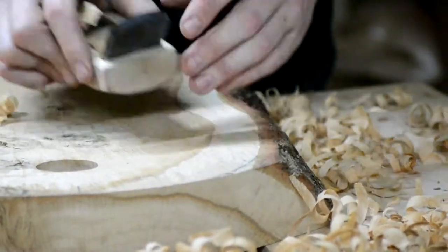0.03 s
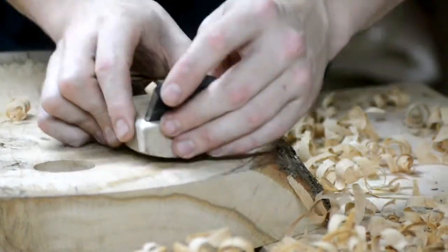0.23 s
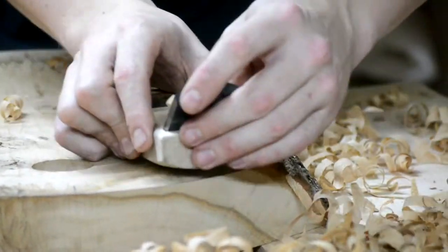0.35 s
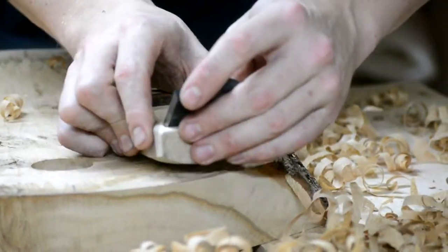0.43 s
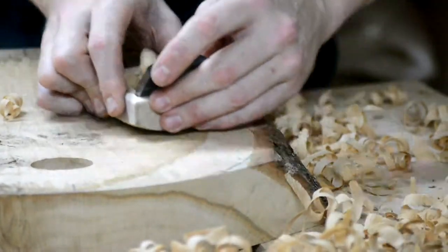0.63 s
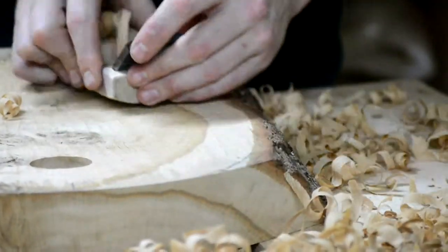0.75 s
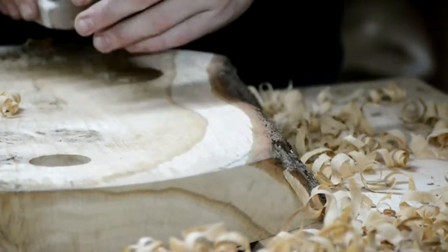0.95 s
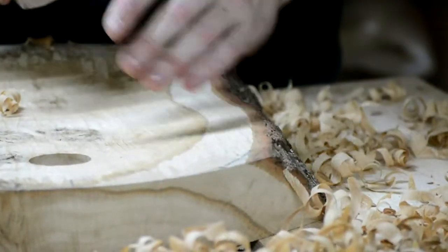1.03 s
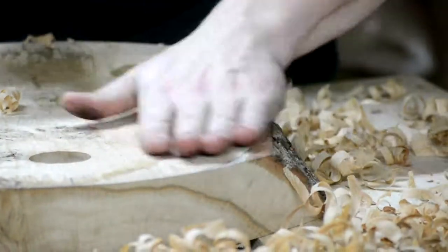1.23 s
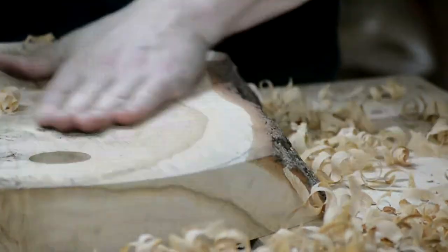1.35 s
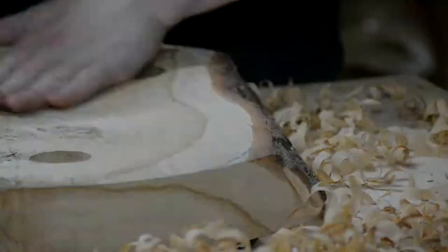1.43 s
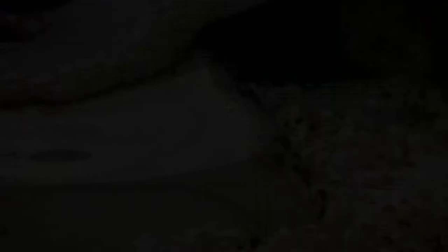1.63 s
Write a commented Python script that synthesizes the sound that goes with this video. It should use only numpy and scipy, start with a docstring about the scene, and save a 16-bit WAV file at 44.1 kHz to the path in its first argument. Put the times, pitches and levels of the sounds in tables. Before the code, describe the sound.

One crisp hand-plane stroke scrapes over hollow wood, followed by a soft pat and brushing palm

```python
"""Quiet workshop air with a thin electronic whine; a small hand plane is set down on a carved wooden seat,
rocks once and takes one shaving; then a palm pats the seat and sweeps across the wood twice.
Air, fibres and skin are shaped noise; knocks, judder and drag excite decaying seat modes, and irregular
slips ring the blade. A low bench thud sounds under the plane's two main knocks and the palm's pat, and a
decaying noise tail gives the short echo."""
import sys
import numpy as np
from scipy import signal
from scipy.fft import rfft, irfft, next_fast_len
from scipy.io import wavfile
from scipy.ndimage import uniform_filter1d

SR = 44100
rng = np.random.default_rng(int(sys.argv[2]) if len(sys.argv) > 2 else 0)


def master_out(mix):
    """Clip the mix to full scale and print it as 16-bit PCM to the path in sys.argv[1]."""
    frames = np.transpose(np.atleast_2d(mix))
    ceiling = np.clip(frames, -1, 1)
    pcm = np.round(ceiling * 32767).astype(np.int16)
    wavfile.write(sys.argv[1], SR, pcm)


def invert_db(level):
    """Linear amplitude ratio for a level in decibels (20 dB per decade), elementwise."""
    return 10 ** (np.asarray(level, dtype=float) / 20)


N = 74970
TIME = np.arange(N) / SR  # s

# Spectrum of tearing wood fibres, also heard in each contact tick.
# Each row: frequency in Hz, relative spectral level in dB.
FIBRE_SPECTRUM = [(410, -7), (700, -4), (980, -27.5), (1120, -9), (2220, -12), (2800, -18.5), (3540, -6),
                  (4350, -18.5), (10500, -34), (15500, -61)]
PRESSED_FREE_S = 0.018  # how long the seat rings freely under a sliding tool or palm


def level(x, db):
    """Scales a signal to a given root-mean-square level."""
    return x * invert_db(db) / np.sqrt(np.mean(x ** 2))


def unit(h):
    """Normalises an impulse response to unit energy."""
    return h / np.sqrt(np.sum(h ** 2))


def conv(x, h):
    """Linear response by convolution, cut to the scene's length."""
    return signal.fftconvolve(x, h)[:N]


def colour(x, table):
    """Spectral shaping by (Hz, dB) points on a log axis; white noise of rms 1 stays near rms 1."""
    n = next_fast_len(len(x) + 4096)
    points = np.array(table, float)
    hz = np.arange(n // 2 + 1) * SR / n
    gain = invert_db(np.interp(np.log(hz + 1), np.log(points[:, 0]), points[:, 1]))
    gain = gain / np.sqrt(np.mean(gain ** 2))
    return irfft(rfft(x, n) * gain, n)[:len(x)]


def curve(table, axis):
    """Envelope interpolated in dB from one column: -120 dB before the first row, held after the last."""
    points = np.array(table, float)
    db = np.interp(TIME, points[:, 0], points[:, axis], left=-120, right=points[-1, axis])
    return invert_db(db)


def walk(rate):
    """Slow random modulation: levels held for 1 / rate seconds, smoothed by two moving averages."""
    hold = int(SR / rate)
    steps = np.repeat(rng.standard_normal(N // hold + 1), hold)
    return 0.6 * uniform_filter1d(uniform_filter1d(steps, hold), hold)[:N]


def grit(rate, spread_db, smooth):
    """Friction as random slips of uneven size (rate per second) over a share of even noise, rms 1."""
    happens = rng.random(N) < rate / SR
    sign = rng.choice([-1, 1], N)
    slips = happens * sign * invert_db(spread_db * rng.exponential(size=N))
    return level(level(slips, 0) + smooth * rng.standard_normal(N), 0)


def stroke_position():
    """Linear travel of the plane along its stroke, from 0 to 1."""
    return np.interp(TIME, (0.48, 0.9), [0, 1])


def seat_ring(place, free_s):
    """Modal superposition: the place touched weights each mode; pressure adds damping after free_s."""
    # Seat modes. Each row: frequency in Hz, relative level in dB, 60 dB decay time in seconds.
    seat_modes = [(151.4, -10, 0.19), (186.1, -8.5, .45), (217.6, -1.5, 0.11), (294.4, -14, 0.36),
                  (328.5, 1, 0.32), (354.6, -7.5, 0.24), (387.7, -4, 0.45), (463, -2, 0.061),
                  (538, -6.5, 0.11), (641.2, -1.5, 0.22), (668, -8, 0.12), (788, -18.5, 0.62),
                  (927, -14, 0.046), (1040, -7.5, 0.064), (1104, -6.5, 0.087), (1230, -8.5, 0.054),
                  (1470, -14.5, 0.13), (1719, -16, .08), (1930, -12, 0.15), (2197, -14, 0.028)]
    t = np.arange(SR // 2) / SR
    ring = np.zeros(len(t))
    for hz, db, t60 in seat_modes:
        # bending wavelength falls as the square root of frequency
        shape = np.sin(np.pi * place * np.sqrt(hz / 30))
        decay = np.exp(-np.log(1000) * t / t60)
        ring += invert_db(db) * shape * np.sin(2 * np.pi * hz * t) * decay
    pressed = np.exp(-np.maximum(t - free_s, 0) / 0.012)
    return ring * pressed


def shop():
    """Stationary shaped noise, as mid and side, for workshop air; a steady sine for an electronic whine."""
    # Air in the mid and side channels. Each row: frequency in Hz, relative spectral level in dB.
    mid_spectrum = [(15, -57.5), (25, -22), (148, -25), (274, -11.5), (359, -7.5), (421, -14.5), (666, -12),
                    (848, -18), (1050, -13.5), (1140, -15), (2920, -26), (10600, -41), (15500, -52)]
    side_spectrum = [(15, -59), (25, -29), (349, -8), (389, -7), (848, -5.5), (919, -8), (1170, -5),
                     (15500, -27.5)]
    whine = invert_db(-75) * 2 ** .5 * np.sin(2 * np.pi * 15671 * TIME)
    air = level(colour(rng.standard_normal(N), mid_spectrum), -51.5)
    air = air * invert_db(0.233 * walk(2))  # gentle unsteadiness in dB
    side = level(colour(rng.standard_normal(N), side_spectrum), -60)
    return air + whine, side


def blade(cut):
    """Stick-slip excitation of resonances: slips at the edge ring the plane's blade and body."""
    # Blade and body resonances. Each row: frequency in Hz, bandwidth in Hz, relative level in dB,
    # change in level along the stroke in dB.
    resonances = [(1132, 44, -1, 5), (1367, 280, -9.5, 32), (1573, 49, -5, -4), (1642, 23, 0.5, -14),
                  (1862, 61, -1, 8), (2202, 52, 0, -4), (2627, 78, -9, 1), (2897, 88, -7.5, -6.5),
                  (3370, 130, -6, 4), (3630, 250, -10, 4), (4750, 350, -16.5, 5), (5230, 73, -12, -3),
                  (6220, 300, -13, 6), (9200, 500, -21.5, 3), (10600, 900, -23, -0.5)]
    t = np.arange(SR // 10) / SR
    along = stroke_position()
    edge = grit(2000, 2.5, 0.9) * cut * invert_db(4.3 * walk(38.6))
    out = np.zeros(N)
    for k, (hz, width_hz, db, gain_db) in enumerate(resonances):
        ring = unit(np.sin(2 * np.pi * hz * t) * np.exp(-np.pi * width_hz * t))
        gain = invert_db(db + gain_db * (along - .5) + 1.9 * walk(17.65))
        polarity = (-1) ** k
        out += polarity * gain * conv(edge, ring) * np.sqrt(width_hz / 400)
    return invert_db(0.5) * out


def fibres(cut):
    """Fracture noise: many small irregular slips, spectrally shaped, for tearing fibres."""
    return colour(grit(5600, 1.9, 0.78) * cut, FIBRE_SPECTRUM)


def plane_edge():
    """Common excitation: one envelope of dragging and cutting drives both blade and fibres."""
    # Dragging and cutting. Each row: time in seconds, relative level in dB.
    cutting = [(.222, -82), (.228, -49), (.25, -53), (.3, -49.5), (.35, -74), (.372, -51), (.41, -70.5),
               (.45, -83), (.475, -52.5), (.495, -43), (.52, -36), (.555, -32.5), (.59, -31), (.65, -31.5),
               (.7, -31.5), (.76, -32), (.812, -34.5), (.826, -42.5), (.86, -45), (.9, -55), (.95, -65),
               (1.02, -62)]
    cut = curve(cutting, axis=1) * (TIME < cutting[-1][0])
    return blade(cut) + fibres(cut)


def knocks():
    """Impact excitation: a short rounded push rings the seat modes, with a noisy tick of contact."""
    # Knocks on the seat. Each row: start in seconds, relative level in dB, contact in ms,
    # place from the edge (0-1), time in seconds until hand or tool presses down and damps the ring.
    landings = [(0.227, -16.5, 0.33, 0.3, 0.022), (0.2318, -12, 0.41, .40, 0.034),
                (0.2531, -17.5, .6, 0.37, 0.014), (0.297, -18, 0.79, 0.3, 0.024),
                (.3665, -21, 0.57, .13, 0.073), (.372, -19, 1.64, 0.28, 0.089),
                (0.392, -13, 1.9, 0.28, 0.041), (.676, -27, 0.3, 0.39, 0.054),
                (0.8187, -18.5, 1.05, 0.37, 0.021), (0.898, -29, 1.3, 0.22, 0.027),
                (1.194, -28.5, 1.13, 0.24, .008), (1.2004, -26.5, 1.6, 0.26, 0.0098),
                (1.2165, -21.5, 2.0, 0.28, 0.05)]
    out = np.zeros(N)
    t = np.arange(600) / SR
    for start_s, db, contact_ms, place, free_s in landings:
        push = t * np.exp(-t / (contact_ms / 2000))  # peaks at half the contact time
        hit = signal.fftconvolve(seat_ring(place, free_s), push / push.sum())
        tick = rng.standard_normal(600) * np.exp(-t / 0.0023)
        hit[:600] += invert_db(-29) * colour(tick, FIBRE_SPECTRUM)
        i = int(start_s * SR)
        out[i:i + len(hit)] += invert_db(db) * hit[:N - i]
    return out


def bench():
    """Damped low resonance: thuds that swell and die under the plane's two main knocks and the palm's pat."""
    # Thuds. Each row: start in seconds, relative level in dB.
    thuds = [(.228, -59.5), (0.369, -54), (1.196, -53)]
    out = np.zeros(N)
    t = np.arange(SR // 2) / SR
    decay = np.exp(-np.log(1000) * t / .25)  # 60 dB in 0.25 s
    swell = 1 - np.exp(-t / 0.012)
    thud = np.sin(2 * np.pi * 62 * t) * decay * swell
    for start_s, db in thuds:
        i = int(start_s * SR)
        out[i:i + len(t)] += invert_db(db) * thud[:N - i]
    return out


def room():
    """Diffuse reverberation: octave bands of noise, each with its own exponential decay and level."""
    # Room tail. Each row: frequency in Hz, 60 dB decay time in seconds, relative level in dB.
    decays = np.array([(151, 0.17, -9), (390, 0.74, -6), (1000, 0.5, 0), (4000, 0.53, -1), (12180, 0.4, 0)], float)
    gap_s = 0.0041  # silence before the tail, then an equally long rise
    t = np.arange(int(.8 * SR)) / SR
    noise = rng.standard_normal(len(t))
    tail = np.zeros(len(t))
    for hz in 110 * 2. ** np.arange(8):
        t60 = np.interp(np.log(hz), np.log(decays[:, 0]), decays[:, 1])
        db = np.interp(np.log(hz), np.log(decays[:, 0]), decays[:, 2])
        octave = signal.butter(2, [hz / 2 ** .5, hz * 2 ** .5], "band", fs=SR, output="sos")
        tail += signal.sosfilt(octave, noise) * invert_db(db) * np.exp(-np.log(1000) * t / t60)
    return unit(tail * np.clip(t / gap_s - 1, 0, 1))


def sole():
    """Frictional judder as a moving force: the plane's sole shakes the seat along its path."""
    # Judder of the sole. Each row: time in seconds, relative level in dB.
    shaking = [(.235, -50), (.27, -29.5), (.31, -31), (.355, -41), (.38, -26), (.45, -49.5), (.48, -36),
               (.5, -32), (.53, -28), (.56, -27.5), (.6, -31), (.64, -27.5), (.665, -27.5), (.69, -32),
               (.75, -33.5), (.8, -33), (.83, -44), (.9, -42.5), (.95, -54), (1.0, -59)]
    along = stroke_position()
    judder = grit(700, 2.0, .8) * curve(shaking, axis=1) * invert_db(1.5 * walk(40))
    judder = signal.lfilter([1], [1, -.85], judder) / 8  # favours the lower frequencies
    first_ring = unit(seat_ring(0.388, PRESSED_FREE_S))
    last_ring = unit(seat_ring(0.344, PRESSED_FREE_S))
    seat = conv(judder * (1 - along), first_ring) + conv(judder * along, last_ring)
    return seat / np.hypot(along, 1 - along)  # equal-power crossfade between the places


def palm():
    """Sliding friction: skin hisses over the wood and its light drag wakes the seat's upper modes."""
    # Palm sweeps. Each row: time in seconds, relative level in dB, drag on the seat in relative dB.
    sweeps = [(1.17, -72, -10), (1.195, -66.5, -22), (1.212, -59.5, -23), (1.236, -64, -24.5),
              (1.26, -55, -4), (1.3, -52, 2), (1.346, -47.5, -7), (1.42, -47, -7), (1.476, -49.5, -32),
              (1.53, -54.5, -16), (1.56, -59.5, -20), (1.58, -74.5, -18), (1.63, -64, -12), (1.66, -58, -8),
              (1.685, -54, 3), (1.7, -55, 2)]
    # Skin on wood. Each row: frequency in Hz, relative spectral level in dB.
    skin_spectrum = [(88, -54), (150, 2), (269, -9), (291, -14), (382, -18), (532, -2.5), (660, -6),
                     (2170, -1), (10500, -7), (15800, -24)]
    rub = curve(sweeps, axis=1) * invert_db(.8 * walk(31.2))
    hiss = invert_db(2.5) * colour(grit(6700, 2.0, 1.14) * rub, skin_spectrum)
    drag = grit(1500, 2.0, 1.0) * rub * curve(sweeps, axis=2)
    ring = unit(np.diff(seat_ring(0.332, PRESSED_FREE_S), 2))  # differencing lifts the upper modes
    return hiss + conv(drag, ring)


def scene():
    """Superposition in mid and side: work near the middle, a little left, with its echo over the air."""
    echo_db, echo_side_db, left_db = -6, -3, 1.035  # side relative to mid echo; left relative to right
    mid, side = shop()
    work = plane_edge() + knocks() + sole() + palm()
    radiation = signal.butter(6, 167.8, "high", fs=SR, output="sos")  # weak radiation of the lows
    work = signal.sosfilt(radiation, work)
    mid = mid + work + bench() + invert_db(echo_db) * conv(work, room())
    side_echo = colour(conv(work, room()), [(200, -28), (2000, -3), (10000, 14)])
    side = side + invert_db(echo_db + echo_side_db) * side_echo
    balance = invert_db(np.array([[left_db], [-left_db]]) / 2)
    return np.array([mid + side, mid - side]) * balance


def low_pass(x):
    """Removes everything above the highest recorded frequency."""
    return signal.sosfilt(signal.butter(12, 16170, fs=SR, output="sos"), x)


def record(dry):
    """Flat pickup: no microphone colour is added before the finished mix is stored."""
    return low_pass(dry)


dry = scene()
out = record(dry)
master_out(out)
```